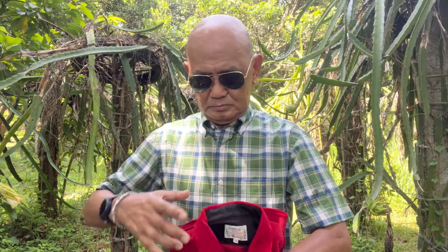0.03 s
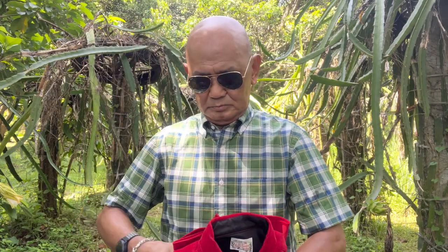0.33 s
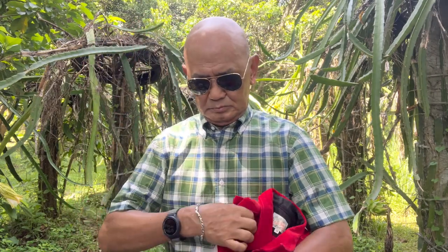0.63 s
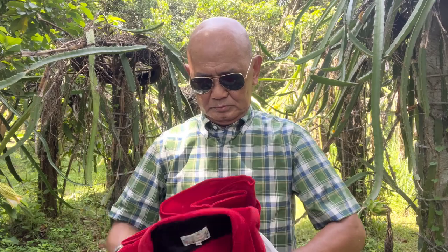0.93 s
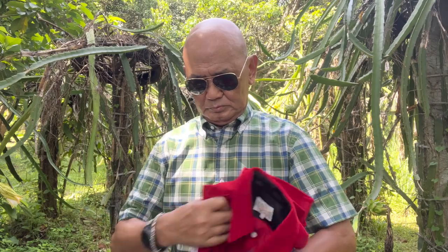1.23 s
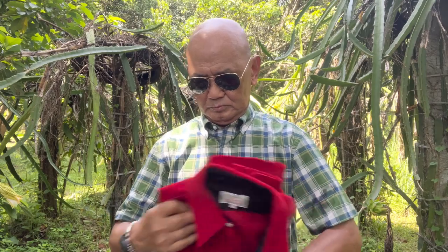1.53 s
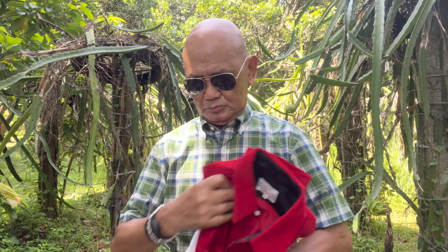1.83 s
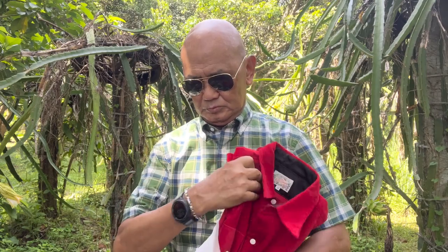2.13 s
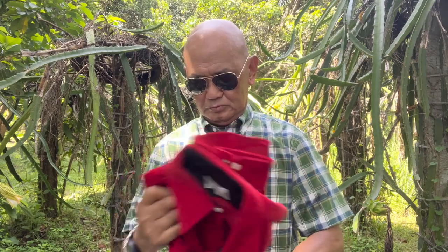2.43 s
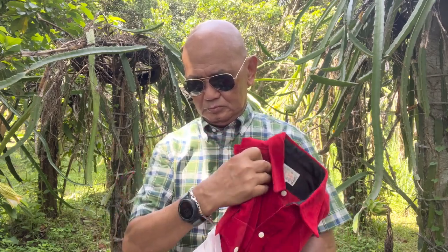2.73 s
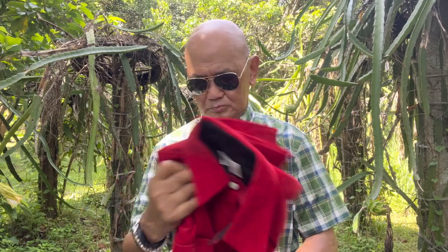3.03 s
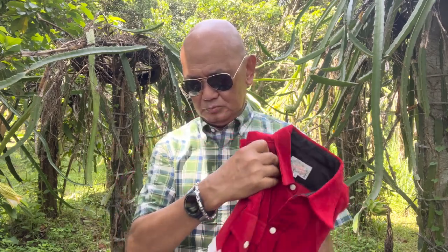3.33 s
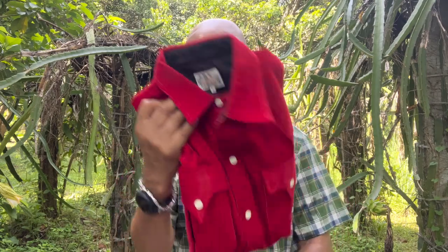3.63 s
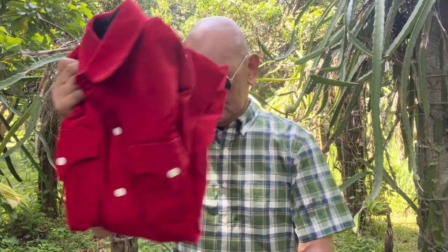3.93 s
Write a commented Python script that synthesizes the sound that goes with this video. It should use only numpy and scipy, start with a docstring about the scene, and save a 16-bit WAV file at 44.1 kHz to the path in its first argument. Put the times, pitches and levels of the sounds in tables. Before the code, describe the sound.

Corduroy cloth is turned over in the hands near the microphone outdoors. It starts softly, then swishes and scratches in repeated strokes, flapping now and then before easing off, over a faint low hum.

```python
"""Corduroy shirt handled in a garden.

A folded shirt is turned and rubbed in the hands, close to a two-port microphone. Ribs of the pile
catch and slip in a dense fine hiss, the folds rustle lower down, and now and then the slack cloth
flaps, pushes air or snaps taut. A low hum and faint outdoor air lie behind."""
import sys
import numpy as np
from scipy import signal
from scipy.fft import rfft, irfft
from scipy.io import wavfile
from scipy.ndimage import uniform_filter1d, map_coordinates

SR = 44100
rng = np.random.default_rng(int(sys.argv[2]) if len(sys.argv) > 2 else 0)


def pcm_store(signal):
    """Save signal as 16-bit PCM."""
    levels = np.round(np.clip(np.atleast_2d(signal), -1, 1) * 32767)
    wavfile.write(sys.argv[1], SR, levels.astype(np.int16).T)


N = 176400
T = np.arange(N) / SR
FREQS_HZ = np.maximum(np.arange(N // 2 + 1) * SR / N, 1)

# Spectrum of slipping ribs. Each row: frequency in Hz, relative level in dB.
PILE_SPECTRUM = [(1200, -3.5), (2300, -6), (3200, -5.5), (4500, -2.5), (6500, -2.5), (8500, 1.5),
                 (10000, 1), (12000, -4.5), (13500, -1), (14300, -2.5), (15500, -30)]
PILE_SLIPS_PER_S, PILE_SPREAD_DB = 16000, 3
FLUTTER_PER_S = 70


def undb(db):
    """Decibels to gain."""
    return 10 ** (np.asarray(db) / 20)


def unit(x):
    """Scale to rms 1."""
    return x / np.sqrt(np.mean(x ** 2))


def over_hz(points):
    """Join (Hz, value) points on a log-frequency axis."""
    hz, value = np.array(points, float).T
    return np.interp(np.log(FREQS_HZ), np.log(hz), value)


def colour(x, points):
    """Filter x by (Hz, dB) points; rms 1."""
    return unit(irfft(rfft(x) * undb(over_hz(points)), N))


def resonate(x, hz, width_hz):
    """A two-pole resonance applied twice; rms 1."""
    b, a = signal.iirpeak(hz, hz / width_hz, fs=SR)
    return unit(signal.lfilter(b, a, signal.lfilter(b, a, x)))


def walk(per_s):
    """Random values joined by ramps; spread near 1."""
    hold = int(SR / per_s)
    return 1.01 * uniform_filter1d(rng.standard_normal(N)[np.arange(N) // hold], hold)


def swell(start_s, attack_s, decay_s):
    """Quick rise, exponential fall; peaks below 1."""
    age_s = np.maximum(T - start_s, 0)
    return (1 - np.exp(-age_s / attack_s)) * np.exp(-age_s / decay_s)


def slips(per_s, spread_db):
    """Random stick-slip impulses, many weak, a few strong; power independent of rate."""
    chance = np.clip(per_s / SR, .001, 1)
    happens = rng.random(N) < chance
    size = undb(spread_db * np.minimum(rng.exponential(size=N), 6))
    return happens * size * rng.choice([-1, 1], N) / np.sqrt(chance)


def stereo(pair):
    """Mix two unrelated signals as a shared and an opposed part; the ports add lag and tilt."""
    # Stereo likeness of left and right; around 11-12.5 kHz both sides are alike. Each row: frequency in Hz,
    # likeness from 0 to 1.
    stereo_likeness = [(100, 0.86), (380, 0.73), (620, 0.47), (1400, 0.98), (2300, 0.71), (2900, 0.81),
                       (4000, 0.63), (5200, 0.5), (6100, 0.13), (8000, 1), (9300, 0.59), (10200, 1),
                       (11000, 0.99), (12500, 1), (13500, 0.56), (14500, 1)]
    # Each row: frequency in Hz, left minus right in dB.
    port_balance = [(100, -1), (2000, -0.1), (3200, -1), (4600, -3), (6200, -8), (7800, -1.5), (10000, 0)]
    # Each row: frequency in Hz, lead of the left port in radians.
    port_phase = [(100, 0), (1500, -.15), (3200, -.3), (4300, -1), (5600, -1.1), (6400, -3), (8200, -3.1),
                  (10200, -1.1), (10700, 0), (13000, 0), (13900, 3)]
    shared, opposed = rfft(pair)
    likeness = np.clip(over_hz(stereo_likeness), 0, 1)
    side = np.array([[1], [-1]])
    heard = shared * np.sqrt((1 + likeness) / 2) + side * opposed * np.sqrt((1 - likeness) / 2)
    tilt = undb(side * over_hz(port_balance) / 2)
    lag = np.exp(.5j * side * over_hz(port_phase))
    return irfft(heard * tilt * lag, N)


def garden():
    """A wavering low hum and faint outdoor air."""
    # Swell of the hum. Each row: time in seconds, level in dB.
    hum_levels = [(0, -57), (.4, -49.5), (.66, -49), (1.0, -50.5), (1.28, -52.5), (1.7, -49.5), (2.1, -53),
                  (2.6, -45.5), (2.92, -57), (3.12, -45.5), (3.36, -45), (3.6, -50.5), (4, -46)]
    # Outdoor air. Each row: frequency in Hz, relative level in dB.
    air_spectrum = [(20, -26), (45, 0), (100, 2), (140, -1.5), (220, -8.5), (420, -9.5), (700, -12),
                    (1500, -22.5), (3000, -24), (10000, -26), (15500, -41)]
    air_db, waver_db = -48.5, 3
    hum_hz = 70 + 2.47 * walk(per_s=25.32)
    hum = unit(np.sin(2 * np.pi * np.cumsum(hum_hz) / SR) * undb(waver_db * walk(per_s=10)))
    hum_db = np.interp(T, *np.array(hum_levels).T)
    air = np.array([colour(rng.standard_normal(N), air_spectrum) for _ in range(2)])
    return undb(hum_db) * hum + undb(air_db) * stereo(air)


def puffs():
    """Soft low pushes of air from the swinging shirt."""
    # Each row: start in seconds, gain in dB, centre in Hz, decay in seconds.
    pushes = [(0.495, -30.5, 184, 0.015), (.749, -27, 182, 0.015), (.85, -39, 167, .03),
              (1.531, -34.5, 135, 0.033), (1.808, -32, 188, 0.017), (1.815, -28, 89.6, 0.025),
              (2.189, -37, 131, .025), (2.46, -37.5, 75, 0.061), (2.625, -37, 109, 0.031)]
    out = np.zeros(N)
    for start_s, db, hz, decay_s in pushes:
        air = resonate(rng.standard_normal(N), hz, width_hz=.96 * hz)
        out += undb(db) * swell(start_s, attack_s=.011, decay_s=decay_s) * air
    return out


def flaps():
    """Soft thuds: a few noisy swings that sag in pitch as the cloth slackens."""
    # Each row: start in seconds, gain in dB, starting pitch in Hz, decay in seconds.
    thuds = [(.1455, -26, 340, .0045), (.482, -21.5, 400, .0048), (.496, -22.5, 373, .0095),
             (.744, -24, 358, .012), (1.545, -35.5, 274, .028), (1.803, -22.5, 480, .011),
             (1.807, -31, 850, .011), (1.816, -27, 380, .016), (1.882, -21, 440, .005),
             (2.218, -30.5, 540, .006), (2.277, -33, 517, .009), (2.316, -23.5, 480, .0045),
             (2.492, -33, 500, .02), (2.61, -36, 420, .014), (2.86, -36, 420, .016)]
    sag_share, sag_s, noise_db = .42, .0245, -8
    out = np.zeros(N)
    for start_s, db, hz, decay_s in thuds:
        age_s = np.maximum(T - start_s, 0)
        cycles = hz * ((1 - sag_share) * age_s + sag_share * sag_s * (1 - np.exp(-age_s / sag_s)))
        noise = resonate(rng.standard_normal(N), hz, width_hz=1.1 * hz)
        thud = np.sin(2 * np.pi * cycles) + undb(noise_db) * noise
        out += undb(db) * swell(start_s, attack_s=.0022, decay_s=decay_s) * thud
    return out


def snaps():
    """Folds pulled taut: short rough bursts, the hardest with a tick at its front."""
    # Each row: start in seconds, gain in dB, decay in seconds.
    pulls = [(1.806, -33, .01), (1.882, -24, .008), (2.22, -32, .003), (2.259, -34, .012),
             (2.27, -28.5, .013)]
    # Burst spectrum. Each row: frequency in Hz, relative level in dB.
    snap_spectrum = [(200, -4.5), (600, -7), (1400, -4), (3000, -15), (8000, -20), (15000, -14)]
    attack_s = .0021
    tick_start_s, tick_db, tick_hz, tick_decay_s = 1.8808, -18, 1600, .0006
    bursts = sum(undb(db) * swell(start_s, attack_s, decay_s) for start_s, db, decay_s in pulls)
    age_s = np.maximum(T - tick_start_s, 0)
    tick = undb(tick_db) * np.exp(-age_s / tick_decay_s) * np.sin(2 * np.pi * tick_hz * age_s)
    return bursts * colour(rng.standard_normal(N), snap_spectrum) + tick


def catches():
    """Single bright ticks where a rib snags and lets go."""
    # Each row: start in seconds, level in dB.
    snags = [(.383, -33), (.983, -34.5), (1.429, -25.5), (3.333, -22.5), (3.757, -30)]
    decay_s = .00097
    gain = sum(undb(db) * (T >= start_s) * np.exp(-np.abs(T - start_s) / decay_s)
               for start_s, db in snags)
    return gain * np.array([colour(rng.standard_normal(N), PILE_SPECTRUM) for _ in range(2)])


def swipe():
    """One quick swipe across the ribs: a short narrow-band rasp."""
    rasp = np.array([resonate(slips(PILE_SLIPS_PER_S, PILE_SPREAD_DB), hz=4500, width_hz=680)
                     for _ in range(2)])
    return undb(-28.5) * swell(start_s=.461, attack_s=.014, decay_s=.017) * rasp


def body_reflections(pair):
    """Add faint reflections off the body; their lags shift as the shirt moves."""
    # Lags in seconds: hand, forearm, chest.
    lags_s = [0.000493, .0013, .0029]
    reflection_db = -16.5
    out = pair.copy()
    for lag_s in lags_s:
        delayed_s = T - lag_s * np.exp(.349 * walk(per_s=7))
        reflection = np.array([map_coordinates(x, [delayed_s * SR], mode="mirror") for x in pair])
        out += undb(reflection_db) * reflection
    return out


def creases(stroke_db):
    """Small scratchy catches scattered through each stroke."""
    # Each row: frequency in Hz, relative level in dB.
    crease_spectrum = [(400, -21), (1000, -10), (2000, 2), (5000, 1), (10000, 2.5), (15000, -1)]
    decay_s = .0022
    impulses = np.abs(slips(per_s=140, spread_db=2.5))
    grip = unit(signal.lfilter([1], [1, -np.exp(-1 / (decay_s * SR))], impulses))
    scratch = np.array([colour(grip * rng.standard_normal(N), crease_spectrum) for _ in range(2)])
    return undb(stroke_db - 11) * scratch


def folds(stroke_db):
    """Folds buckling and dragging: coarse, dull grains."""
    # Each row: frequency in Hz, relative level in dB.
    fold_spectrum = [(50, -51), (100, -9.5), (200, -3), (420, 4), (650, -0.5), (850, -0.5), (1250, -2),
                     (1650, -3), (2300, -12), (4000, -17), (8000, -58)]
    trim_db, flutter_db = 1.5, 1.26
    gain = undb(stroke_db + trim_db + flutter_db * walk(FLUTTER_PER_S))
    return gain * np.array([colour(slips(per_s=5000, spread_db=2), fold_spectrum) for _ in range(2)])


def pile(stroke_db):
    """Ribs slipping over each other on two patches: smooth hiss when fast, sparser grains when slow."""
    trim_db, flutter_db = .5, 1
    full_rub_db, thinning_power = -34.5, .9
    gain = undb(stroke_db + trim_db + flutter_db * walk(FLUTTER_PER_S))
    per_s = PILE_SLIPS_PER_S * undb(thinning_power * (stroke_db - full_rub_db))
    return gain * np.array([colour(slips(per_s, PILE_SPREAD_DB), PILE_SPECTRUM) for _ in range(2)])


def scene():
    """The handled shirt in front of the garden."""
    # Hand strokes. Each row: time in seconds, pile hiss drive in dB, fold rustle drive in dB.
    strokes = [(0.0, -48, -44), (0.01, -48.5, -42.5), (0.05, -46.5, -51.5), (0.07, -53.5, -59),
               (0.13, -55.5, -61), (0.15, -51, -48), (0.24, -50.0, -53), (0.33, -44, -44.5),
               (0.38, -42.5, -48.5), (0.433, -42, -49.5), (0.452, -34, -38), (0.474, -30.0, -38.5),
               (0.529, -36, -44), (0.59, -37, -48), (0.62, -43.5, -45.5), (0.672, -49.5, -52.5),
               (0.741, -31, -42), (0.785, -28.3, -42), (0.836, -35, -38), (0.88, -39.5, -41.5),
               (0.918, -46.5, -44.5), (0.99, -52, -56.5), (1.05, -53, -51), (1.09, -37, -44.5),
               (1.168, -31.5, -40.5), (1.24, -37, -44.5), (1.27, -35.5, -40.5), (1.29, -39, -54),
               (1.32, -40, -43), (1.361, -35.5, -43.5), (1.4, -44.5, -52), (1.432, -36, -42.5),
               (1.54, -32.5, -41.5), (1.57, -33.5, -41), (1.605, -41, -46), (1.66, -45.5, -50),
               (1.74, -36, -45), (1.82, -33, -39.5), (1.86, -34, -47), (1.875, -33.5, -42),
               (1.895, -33, -46.5), (1.96, -36, -46), (2.061, -37.5, -48.5), (2.101, -50.5, -56),
               (2.189, -34.0, -45.5), (2.22, -32, -46), (2.245, -34, -42), (2.281, -30, -48),
               (2.308, -38.5, -47.5), (2.4, -39.5, -49.5), (2.471, -30.5, -40), (2.485, -32, -50),
               (2.54, -35, -43), (2.57, -36, -46.5), (2.661, -33, -51), (2.728, -45, -49),
               (2.769, -36, -45.5), (2.809, -38.5, -47.5), (2.861, -31, -45), (2.899, -35, -44),
               (2.96, -43.5, -51), (3.03, -38, -47), (3.096, -32, -42), (3.135, -35.5, -44),
               (3.17, -36, -44.5), (3.22, -36, -47.5), (3.339, -33.5, -46.5), (3.4, -38, -49.5),
               (3.43, -36.5, -46), (3.532, -34, -45.5), (3.6, -37.5, -52.5), (3.67, -40.5, -57),
               (3.752, -39.5, -58), (3.77, -45, -57), (3.93, -50.5, -55.5), (3.97, -49.5, -62),
               (4.0, -42, -70)]
    times_s, pile_points_db, fold_points_db = np.array(strokes).T
    pile_db = np.interp(T, times_s, pile_points_db)
    fold_db = np.interp(T, times_s, fold_points_db)
    rubbing = body_reflections(pile(pile_db) + folds(fold_db) + creases(pile_db))
    return stereo(rubbing + catches() + swipe()) + flaps() + puffs() + snaps() + garden()


def record(dry):
    """The recorder cuts the deep bass and the top."""
    low_cut_hz, high_cut_hz = 45, 15700
    dry = signal.sosfilt(signal.butter(2, low_cut_hz, "high", fs=SR, output="sos"), dry)
    return signal.sosfilt(signal.ellip(10, .2, 80, high_cut_hz, fs=SR, output="sos"), dry)


dry = scene()
out = record(dry)
pcm_store(out)
```